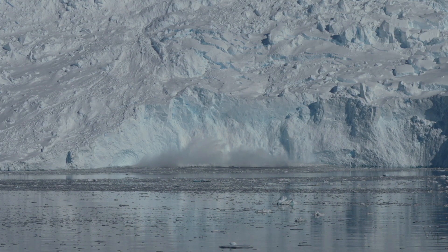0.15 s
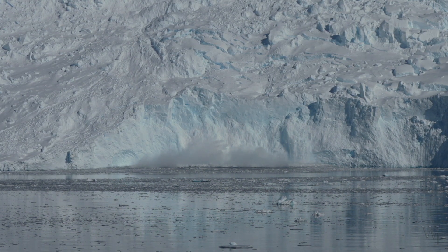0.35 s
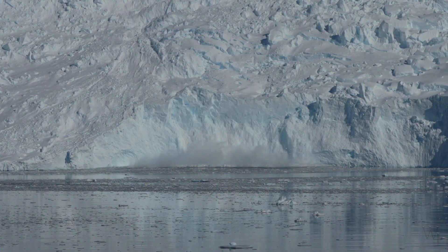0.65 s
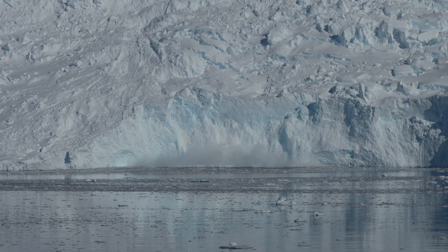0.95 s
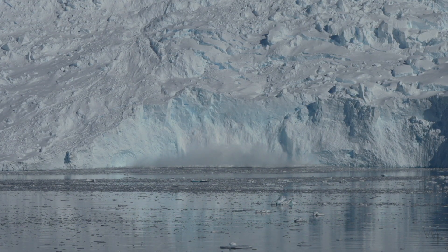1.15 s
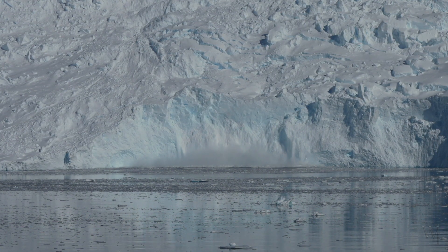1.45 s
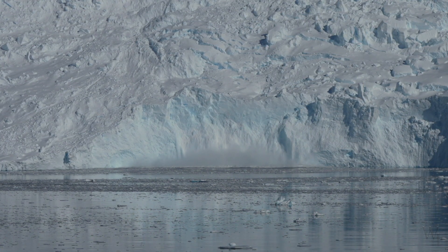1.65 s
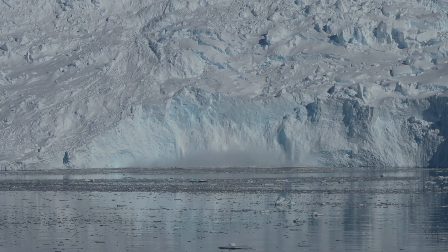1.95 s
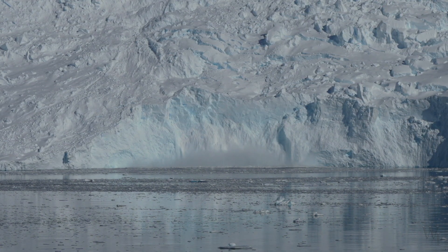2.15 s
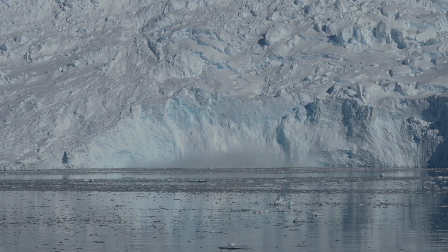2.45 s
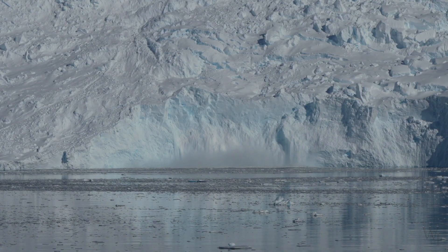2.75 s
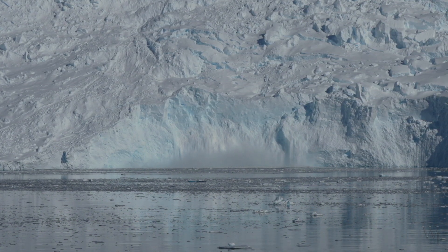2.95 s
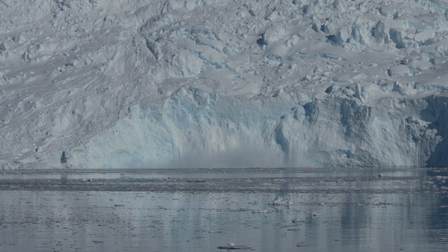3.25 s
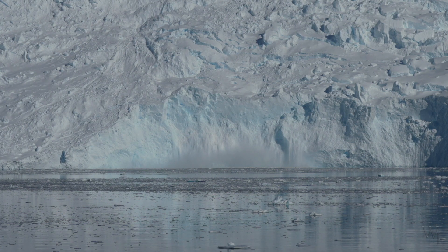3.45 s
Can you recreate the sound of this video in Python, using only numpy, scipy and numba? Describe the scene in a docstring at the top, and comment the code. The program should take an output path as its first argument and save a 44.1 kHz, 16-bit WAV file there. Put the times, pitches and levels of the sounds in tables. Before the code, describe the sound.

Dull, unevenly rolling roar of ice falling far across the water, with low soft thuds; tiny crisp bubble pops from nearby floes grow denser after one second, and one faint brief whistle sounds outdoors.

```python
"""A long, deep, dull rumble rolls in with soft booms: far across calm water a glacier face has shed ice.
The roar is noise in bands of flickering, uneven level; the booms of falling blocks are low damped sines.
Close by, melting floes fizz: air bubbles burst as tiny damped sines, all but the thin ticks echoed twice.
Once a faint whistle of short rising tones sounds.
A faint smooth hiss of air and microphone, made of shaped noise, lies underneath."""
import sys
import numpy as np
from scipy import signal
from scipy.fft import rfft, irfft
from scipy.io import wavfile
from scipy.ndimage import uniform_filter1d
from numba import njit

SR = 44100
rng = np.random.default_rng(int(sys.argv[2]) if len(sys.argv) > 2 else 0)


def natural_amplitude(level_db):
    """Convert a level in decibels to a linear amplitude factor, elementwise."""
    exponent = np.asarray(level_db, float) / 20
    return 10 ** exponent


def put_to_file(sound):
    """Save the sound as 16-bit audio at rate SR, in the file named by the first command-line argument."""
    columns = np.atleast_2d(sound).T  # one column per channel
    safe = np.clip(columns, -1, 1)
    whole_steps = np.round(safe * 32767)
    wavfile.write(sys.argv[1], SR, whole_steps.astype(np.int16))


N = 158760
T = np.arange(N) / SR  # seconds
HZ = np.maximum(np.fft.rfftfreq(N, 1 / SR), 1)

# spectrum shape of the roar, dulled by distance: pitch_hz, relative level_db per Hz
ROAR_SPECTRUM = [(14, -18), (30, -4), (45, -8.5), (70, -1), (120, -2), (176, -2.5), (246, -7.5), (334, -8),
                 (481, -15), (730, -20), (965, -20), (1510, -30), (1900, -37), (2300, -44), (3500, -76)]
# level of the roar at points in time, partly the chance unevenness of its noise:
# time_s, deep level_db, middle level_db, upper level_db
ROAR_LEVEL = [(0.03, -23, -30, -34.5), (0.33, -32, -31.5, -34), (0.38, -33.5, -31, -34.5),
              (0.5, -30.5, -30, -33.5), (1.36, -25.5, -27, -30.5), (1.51, -30.5, -29, -32.5),
              (1.57, -24.5, -31.5, -32), (1.66, -36, -29.5, -31.5), (1.71, -26.5, -27.5, -31),
              (2.22, -30, -29.5, -32.5), (2.29, -28, -27.5, -32.5), (2.47, -30, -28.5, -30.5),
              (3.17, -27.5, -30.5, -34), (3.18, -25.5, -30.5, -32.5), (3.38, -36.5, -28.5, -33.5),
              (3.5, -22, -28, -30.5), (3.55, -36, -39, -31), (3.57, -31.5, -31, -34)]
# spectrum shape of the hiss: pitch_hz, relative level_db per Hz
HISS_SPECTRUM = [(1500, -14), (3000, 4), (5000, -2), (8000, -7.5), (11000, -7.5), (16000, -11.5)]
# activity of the fizz at points in time: time_s, level_db (rms)
FIZZ_LEVEL = [(0, -62), (.5, -59.5), (1.1, -58), (1.55, -55), (1.8, -56.5), (2.1, -55), (2.4, -58),
              (2.7, -56.5), (3.1, -57), (3.3, -58.5), (3.5, -56), (3.6, -58.5)]
# two quick reflections of a bubble: delay_s, level_db relative to the pop
REFLECTIONS = [(.0047, -3), (.0103, -7)]
# soft booms of falling blocks: start_s, level_db (envelope peak), pitch_hz
BOOM_HITS = [(.05, -42, 62), (.12, -19.5, 63.4), (.49, -20, 335), (.52, -13, 301), (.55, -22.5, 362),
             (1.23, -15, 98), (1.29, -33, 70.5), (1.55, -13, 87), (1.703, -14.5, 153), (1.79, -19, 119),
             (2.294, -9, 170), (2.318, -14.5, 101), (2.88, -17, 78), (2.98, -15.5, 87), (3.15, -22, 75),
             (3.31, -22.5, 204)]
# the loudest bubble pops: start_s, level_db (envelope peak), pitch_hz
LOUD_POPS = [(0.289, -47, 6200), (0.5013, -42, 3740), (0.544, -46, 3850), (0.7363, -38.5, 3160),
             (0.7672, -43, 3640), (0.85, -41, 3330), (1.0067, -53, 4720), (1.1134, -40, 4070),
             (1.1423, -42, 3340), (1.172, -43, 6300), (1.2282, -52, 4480), (1.2654, -40, 5200),
             (1.294, -39, 3300), (1.3343, -36, 3900), (1.4158, -50, 4740), (1.4397, -36, 4710),
             (1.4691, -49.5, 3590), (1.4927, -42, 6630), (1.5225, -40, 5200), (1.5874, -40, 3700),
             (1.5885, -44, 5900), (1.6114, -38, 4720), (1.619, -47, 5900), (1.633, -38, 5570),
             (1.6922, -38, 5260), (1.7949, -48, 4290), (1.8717, -39, 3320), (1.94, -34, 4200),
             (2.0125, -40, 5700), (2.045, -42, 4000), (2.0693, -30, 3550), (2.074, -42, 6800),
             (2.0793, -48, 4610), (2.1048, -45, 6870), (2.1153, -44, 4400), (2.1979, -53, 3200),
             (2.2259, -35, 6200), (2.3087, -43, 4500), (2.484, -42, 5200), (2.5786, -44, 3590),
             (2.598, -32.5, 3600), (2.634, -54, 3840), (2.7044, -37.5, 3180), (2.733, -37, 3660),
             (2.7422, -44, 4730), (2.7811, -54, 4680), (2.8101, -56, 5540), (2.829, -35, 3500),
             (2.936, -36, 5400), (3.0137, -37, 4600), (3.0918, -33, 4580), (3.1009, -35, 3240),
             (3.1378, -51, 4150), (3.1742, -41, 7000), (3.2037, -40, 4340), (3.3344, -57, 3310),
             (3.4, -51, 4720), (3.4668, -37, 5000), (3.5449, -42, 3100)]
# the loudest thin ticks of very small bubbles: start_s, level_db (envelope peak), pitch_hz
LOUD_TICKS = [(0.615, -45, 8970), (0.735, -43, 9260), (1.2287, -47, 8780), (1.2726, -43, 8440),
              (1.3109, -49, 9200), (1.4371, -45, 8760), (1.4625, -46, 14500), (1.4645, -51, 9500),
              (1.5219, -47, 9110), (1.5275, -48, 9500), (1.5588, -43, 11000), (1.5985, -48, 12000),
              (1.6458, -42, 11800), (1.6583, -42, 11800), (1.73, -52, 8800), (1.9569, -49, 8820),
              (2.146, -46, 8870), (2.149, -45, 9300), (2.217, -39, 8320), (2.4957, -46, 9040),
              (3.0026, -50, 8880), (3.4181, -52, 10100)]
# tones of the whistle: start_s, length_s, level_db (peak), start pitch_hz, end pitch_hz
WHISTLE_TONES = [(2.338, .036, -39, 1480, 1560), (2.342, .04, -51.5, 2380, 2410),
                 (2.372, .02, -51, 2480, 2580)]
# response of the microphone: pitch_hz, gain level_db
MICROPHONE_RESPONSE = [(10, -24), (28, -10), (42, 0), (2600, -.5), (3400, -.5), (4200, -2.5), (4700, .5),
                       (5600, 0), (6150, -2), (6750, 2.5), (7800, -.5), (9300, 0), (10300, -.5), (22050, 0)]

SPLIT_HZ = 117.8  # top of the deep part; the upper part starts four thirds of an octave above
ROAR_FLICKER_DB, ROAR_FLICKER_PER_S = 0.83, 8.94  # dB per unit of the random walk
HISS_DB = -60.5  # rms
POP_CYCLES, TICK_CYCLES, BOOM_CYCLES = 3.6, 4.5, 1.3  # periods in which the fall reaches 1 / e^2
POP_GLIDE = .02  # share of the pitch gained per cycle
SNAP_DB, SNAP_PITCH, SNAP_CYCLES = -27, 1.35, 1.6  # relative to the pop; pitch is a ratio
ECHO_SCATTER_S, ECHO_SCATTER_DB, ECHO_DETUNE = .0005, 2, .07  # standard deviations; detune is a ratio
FIZZ_COUNT = 3200
FIZZ_HZ, FIZZ_OCTAVES = 5100, .66  # middle pitch and its spread
FIZZ_BUNCH_DB, FIZZ_BUNCH_PER_S = 3, 70  # dB per unit of the random walk
# relative levels inside the fizz: mean excess, cap before tilt, tilt per octave above the middle pitch
FIZZ_SCATTER_DB, FIZZ_MOST_DB, FIZZ_TILT_DB = 4.2, 12.5, -4.5
TAIL_DB, TAIL_T60_S = -14, .04  # scatter among the floes


def curve(table, column=1):
    """A table column joined by straight lines in time."""
    rows = np.array(table, float)
    return np.interp(T, rows[:, 0], rows[:, int(column)])


def colour(points):
    """Gain per frequency from (Hz, dB) points, joined over log frequency, -90 dB outside them."""
    hz, db = np.array(points, float).T
    return natural_amplitude(np.interp(np.log(HZ), np.log(hz), db, left=-90, right=-90))


def unit(x):
    """Scale to rms 1."""
    return x / np.sqrt(np.mean(x ** 2))


def walk(rate):
    """Random levels, each held for 1 / rate seconds, then smoothed twice over that time."""
    hold = int(SR / rate)
    steps = np.repeat(rng.standard_normal(N // hold + 1), hold)
    return uniform_filter1d(uniform_filter1d(steps, hold), hold)[:N]


@njit
def grains(n, at, size, hz, cycles, glide):
    """Damped sines: one cycle of rise, then a fall by 1 / e every cycles / 2 periods, pitch gliding up."""
    out = np.zeros(n)
    for k in range(len(at)):
        period = SR / hz[k]
        for j in range(int(period * (1 + 3 * cycles))):
            i = at[k] + j
            c = j / period
            if i < n:
                env = np.sin(np.pi * c / 2) ** 2 if c < 1 else np.exp(-2 * (c - 1) / cycles)
                out[i] += size[k] * env * np.sin(2 * np.pi * c * (1 + glide * c / 2))
    return out


def play(table, cycles, glide=0.):
    """Rows of start_s, level_db, pitch_hz as damped sines."""
    s, db, hz = np.array(table, float).T
    return grains(N, (s * SR).astype(np.int64), natural_amplitude(db), 1. * hz, float(cycles), float(glide))


def echoed(table, cycles, glide=0.):
    """Bubbles with the bright snap of their tearing film, and reflections random in lag, level and pitch."""
    s, db, hz = np.array(table, float).T
    snap = np.c_[s, db + SNAP_DB, np.minimum(hz * SNAP_PITCH, .4 * SR)]
    out = play(table, cycles, glide) + play(snap, SNAP_CYCLES)
    for delay_s, echo_db in REFLECTIONS:
        scatter = rng.standard_normal((len(s), 3)).T
        echo_s = s + delay_s + ECHO_SCATTER_S * scatter[0]
        level_db = db + echo_db + ECHO_SCATTER_DB * scatter[1]
        pitch_hz = hz * (1 + ECHO_DETUNE * scatter[2])
        out = out + play(np.c_[echo_s, level_db, pitch_hz], cycles, glide)
    return out


def roar():
    """Third-octave bands of noise, each flickering alone; deep, middle and upper part have their own levels."""
    spectrum = rfft(rng.standard_normal(N)) * colour(ROAR_SPECTRUM)
    parts = np.zeros((3, N))
    for third in np.arange(-9, 17):
        # overlapping triangles that crossfade from band to band
        share = np.clip(1 - np.abs(3 * np.log2(HZ / SPLIT_HZ) - third - .5), 0, 1)
        flicker = natural_amplitude(ROAR_FLICKER_DB * walk(ROAR_FLICKER_PER_S))
        part = int(third >= 0) + int(third >= 4)  # deep, middle or upper
        parts[part] += irfft(spectrum * share, N) * flicker
    return sum(unit(part) * natural_amplitude(curve(ROAR_LEVEL, column=k + 1)) for k, part in enumerate(parts))


def hiss():
    """Smooth treble floor of air and microphone: steady shaped noise."""
    noise = irfft(rfft(rng.standard_normal(N)) * colour(HISS_SPECTRUM), N)
    return natural_amplitude(HISS_DB) * unit(noise)


def fizz():
    """Thousands of small bubbles bursting in bunches, a few louder than the rest."""
    place, chance = rng.random((FIZZ_COUNT, 2)).T
    octave = FIZZ_OCTAVES * rng.standard_normal(FIZZ_COUNT)
    hz = np.clip(FIZZ_HZ * 2 ** octave, 1800, 15000)
    bunch_db = FIZZ_BUNCH_DB * walk(FIZZ_BUNCH_PER_S)[(place * N).astype(int)]
    excess_db = -FIZZ_SCATTER_DB * np.log(1 - chance)
    db = np.minimum(bunch_db + excess_db, FIZZ_MOST_DB) + FIZZ_TILT_DB * np.maximum(octave, 0)
    bursts = echoed(np.c_[place * N / SR, db, hz], POP_CYCLES, POP_GLIDE)
    return unit(bursts) * natural_amplitude(curve(FIZZ_LEVEL))


def booms():
    """Falling blocks: low, strongly damped sines."""
    return play(BOOM_HITS, BOOM_CYCLES)


def pops():
    """Trapped air bursting: damped sines gliding up, with snap and reflections."""
    return echoed(LOUD_POPS, POP_CYCLES, POP_GLIDE)


def ticks():
    """Very small bubbles: thin, high damped sines of steady pitch."""
    return play(LOUD_TICKS, TICK_CYCLES)


def bubbles():
    """Fizz, pops and ticks, scattered among the floes into a short diffuse tail of decaying noise."""
    direct = fizz() + pops() + ticks()
    t = T[:SR // 10]
    tail = rng.standard_normal(len(t)) * natural_amplitude(-60 * t / TAIL_T60_S)
    tail = tail / np.sqrt(np.sum(tail ** 2))
    return direct + natural_amplitude(TAIL_DB) * signal.fftconvolve(direct, tail)[:N]


def whistle():
    """Short tones that swell and fade as half a sine while the pitch rises a little."""
    out = np.zeros(N)
    for s, length, db, start_hz, end_hz in WHISTLE_TONES:
        u = np.clip((T - s) / length, 0, 1)  # progress through the tone
        envelope = np.abs(np.sin(np.pi * u))
        turns = length * u * (start_hz + (end_hz - start_hz) * u / 2)
        out += natural_amplitude(db) * envelope * np.sin(2 * np.pi * turns)
    return out


def scene():
    """Everything at one microphone."""
    return (roar() + hiss() + booms() + bubbles() + whistle())[None]


def roll_off(x):
    """The treble ends steeply here."""
    return signal.sosfilt(signal.butter(12, 15750, fs=SR, output="sos"), x)


def record(dry):
    """The microphone loses the deepest bass and has a ripple in the treble."""
    mix = irfft(rfft(dry) * colour(MICROPHONE_RESPONSE), N)
    return roll_off(mix)


dry = scene()
out = record(dry)
put_to_file(out)
```